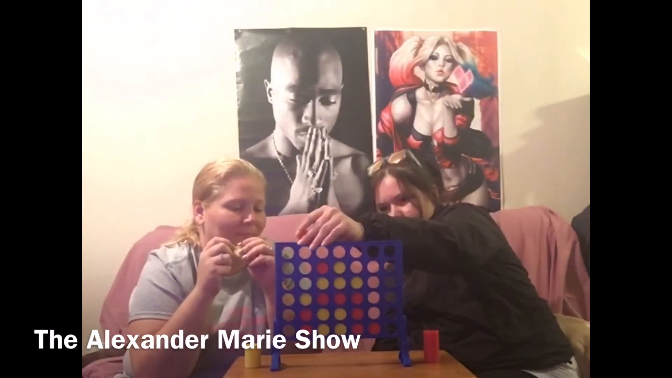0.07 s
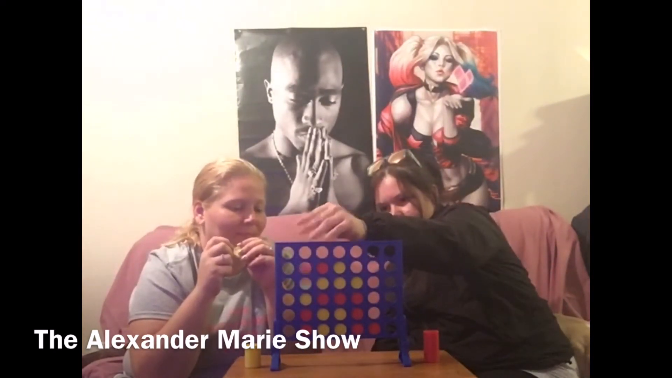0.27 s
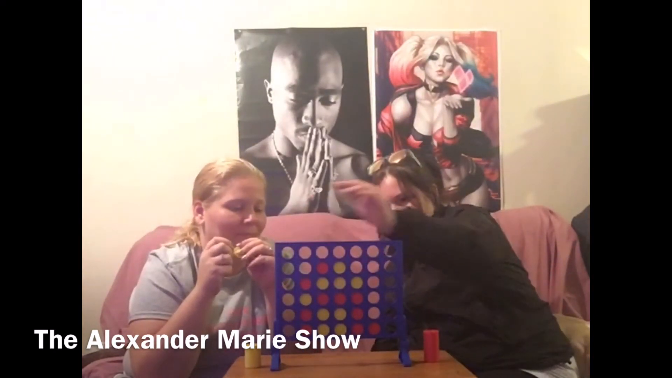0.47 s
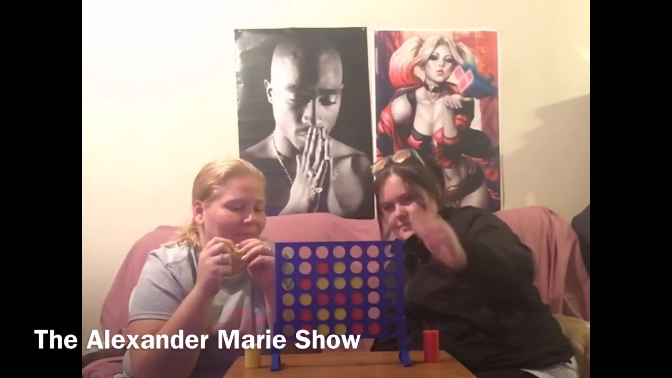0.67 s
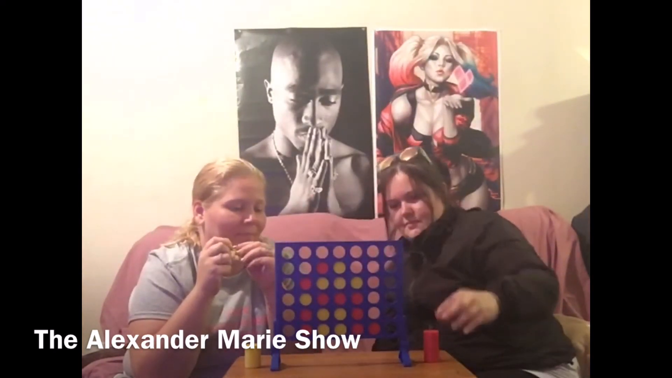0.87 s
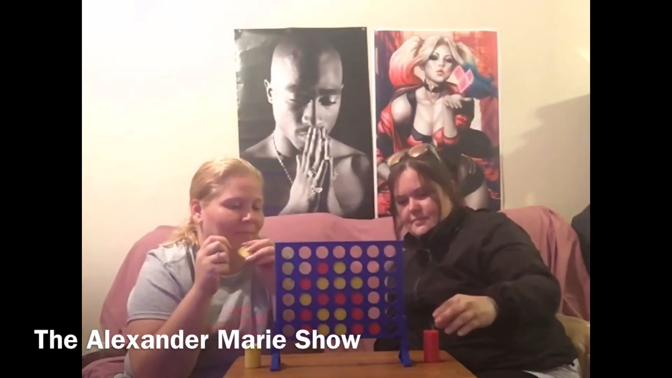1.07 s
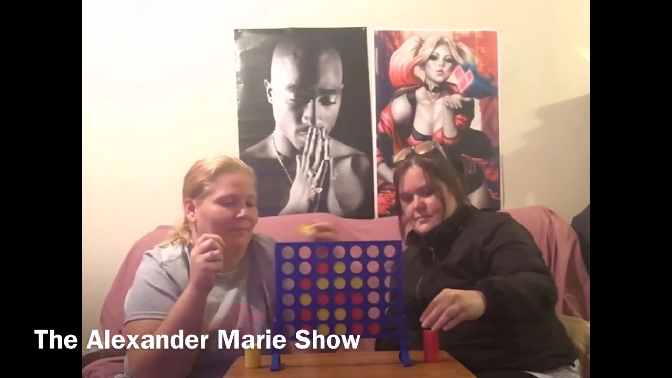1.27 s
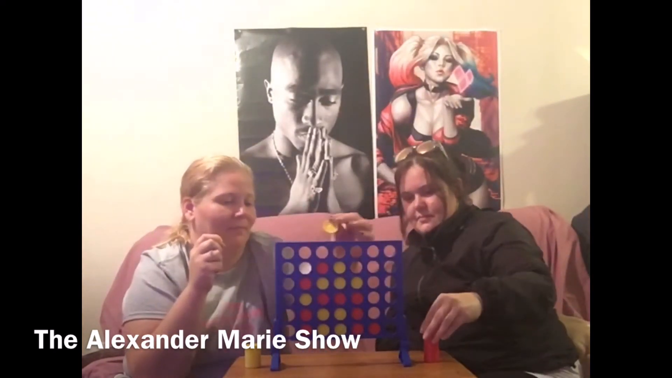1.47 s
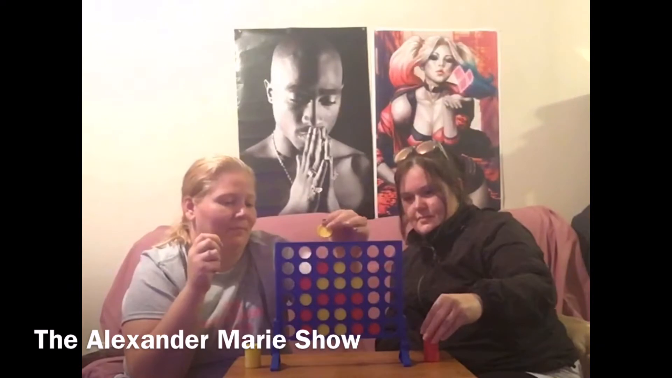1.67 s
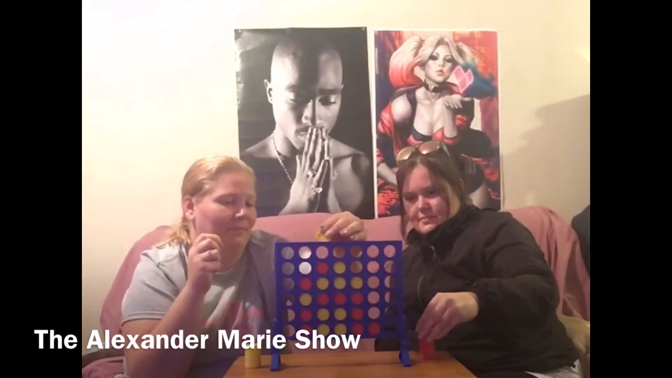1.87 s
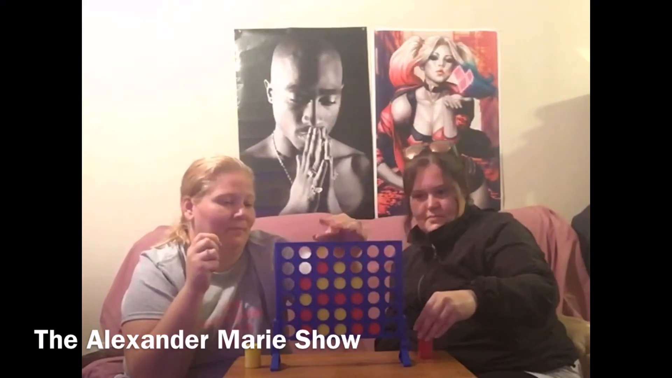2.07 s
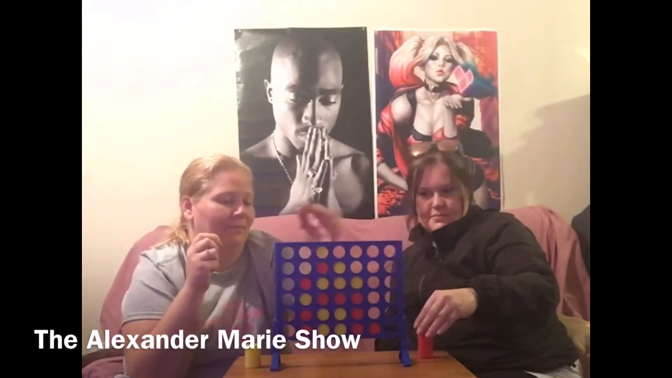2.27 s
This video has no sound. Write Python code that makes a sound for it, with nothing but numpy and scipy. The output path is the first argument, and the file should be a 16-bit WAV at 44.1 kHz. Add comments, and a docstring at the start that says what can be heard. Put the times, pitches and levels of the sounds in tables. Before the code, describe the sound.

Two plastic discs clatter down a game grid in a small, quiet room. The first lands hard, lightly thumping the table and overloading the microphone; the second rubs at the slot, then rattles down more softly over faint hiss.

```python
"""Two discs dropped into a game grid

An upright grid on a table in a small, quiet room, on one microphone. Each plastic disc ticks against the
slot, lands on the stack and rattles to rest: the grid clacks, the disc rings near 4.3 kHz. The first
landing thumps the table and overloads the microphone; soft rubbing leads up to the second drop.
Behind it all lies the room tone: hiss, low rumble and mains hum."""
import sys
import numpy as np
from scipy import signal
from scipy.fft import rfft, irfft, next_fast_len
from scipy.io import wavfile
from scipy.ndimage import uniform_filter1d

SR = 44100
rng = np.random.default_rng(int(sys.argv[2]) if len(sys.argv) > 2 else 0)


def pcm_store(signal):
    """Save signal as 16-bit PCM."""
    levels = np.round(np.clip(np.atleast_2d(signal), -1, 1) * 32767)
    wavfile.write(sys.argv[1], SR, levels.astype(np.int16).T)


N = 101430

# disc hitting grid or stack: t/s, relative clack level/dB, relative ring level/dB,
# lean towards the disc's upper modes/dB, clack cutoff f/Hz
CONTACTS = [ (0.1446, -19.5, -52.5, -1.5, 2693), (0.1504, -31.5, -23.5, -4.5, 9000),
            (0.1730, -31, -29, -4, 5030), (0.1980, -43.5, -31.5, -4.5, 5000),
            (0.2080, -25.5, -20.5, -3.5, 3000), (0.2248, -4, 7, -4, 16970), (0.2290, -7.5, -21.5, 0, 12000),
            (0.236, -16.5, -5.5, 1.5, 9000), (0.249, -12, -7, -3, 9000), (0.2563, -15.5, -4, 1, 8010),
            (0.2755, -16.5, -9, 1, 8000), (0.2880, -20, -15.5, 0, 8000), (0.3045, -14.5, -18, 8.5, 9935),
            (0.3133, -15.5, -4.5, 4, 7010), (0.3164, -11.5, -13.5, 8.5, 12000),
            (0.3360, -28, -9, 0.5, 6000), (0.3460, -26.5, -8.5, 3, 5950), (0.3730, -32.5, -21.5, 1.5, 6000),
            (1.7823, -34, -50.5, -1.5, 6000), (1.8221, -34, -47.5, 1, 4000),
            (1.8836, -24.5, -23.5, 3, 15000), (1.8939, -27, -35, 0, 9000),
            (1.9050, -26.5, -27.5, 0.5, 10000), (1.9321, -30.5, -20.5, -3.5, 8000),
            (1.9496, -25, -17, 2.5, 15020), (1.9610, -38.5, -18, -1, 9060), (1.9738, -10.5, -16, 4, 14000),
            (1.9804, -13.5, -12.5, -3.5, 12000), (1.9925, -16, -23, -2.5, 9060),
            (2.005, -22.5, -15.5, 3, 8990), (2.018, -18.5, -15, 1.5, 9000), (2.0270, -23, -22, 0, 9000),
            (2.0460, -25.5, -20.5, -2, 7000), (2.075, -37.5, -27, -3.5, 6000),
            (2.1130, -50.5, -30, 1, 6015), ]
# spectrum of the clack: f/Hz, relative level/dB
CLACK_SPECTRUM = [(100, -28.5), (300, -16.5), (650, -23.5), (1050, -12), (1900, -5), (2800, -1), (4200, 5),
                  (5500, 1), (7000, -2), (9000, -6), (11000, -11.5), (13200, -11), (15800, -13)]
# modes of the grid's frame: f/Hz, relative level/dB, t60/s
FRAME_MODES = [ (1018, -10.5, .12), (1423, -10, .12), (2776, -3.5, 0.18), (2793, -4.5, .12),
               (3527, -3.5, 0.13), (3579, -1.5, 0.14), (3906, 1.5, 0.21), (3900, -2.5, .14),
               (3996, -0.5, .14), (4070, -1.5, .14), (4608, -5, 0.14), (5120, -5, 0.17), (5430, -5, 0.22),
               (5761, -9.5, .16), ]
CLACK_DB, CLACK_T60_S, FRAME_DB = 14.5, .02, -20
CLACK_ROOM_DB, RING_ROOM_DB = 3, -4  # room over direct sound at the microphone


def grid_clacks():
    """Every contact cracks through the grid and rings its hollow frame a little differently."""
    t = np.arange(SR // 10) / SR
    modes = ringing(FRAME_MODES)
    strength = undb(np.array(FRAME_MODES)[:, 1])
    cracks, frame = np.zeros(N), np.zeros(N)
    for start, clack_db, _, _, cutoff_hz in CONTACTS:
        burst = rng.standard_normal(len(t)) * fade(t, CLACK_T60_S)
        burst = signal.lfilter(*signal.butter(2, cutoff_hz, fs=SR), burst / np.linalg.norm(burst))
        add(cracks, start, undb(CLACK_DB + clack_db) * burst)
        signs = rng.choice([-1, 1], len(strength))
        add(frame, start, undb(FRAME_DB + clack_db) * (strength * signs) @ modes)
    return room(colour(cracks, CLACK_SPECTRUM), CLACK_ROOM_DB) + room(frame, RING_ROOM_DB)


# modes of a disc, plus a brief high microphone ring near 14 kHz:
# f/Hz, relative level/dB, t60/s, share of the contact's lean
RING_MODES = [ (4233, -1, 0.058, -1), (4294, -8, 0.02, 0), (4308, -7, .06, 0), (4333, -8, 0.15, 1.2),
              (4294, -11.5, 0.067, 0.7), (6540, -33, 0.047, .5), (7960, -35.5, 0.129, 1.7),
              (7880, -31, 0.16, 1.7), (12950, -32.5, 0.045, 0), (13950, -30, 0.02023, -1), ]
RING_DB = -1.5


def disc_rings():
    """Each contact rings the disc and, briefly, the microphone; the spot struck decides which modes lead."""
    _, db, _, share = np.array(RING_MODES).T
    modes, out = ringing(RING_MODES), np.zeros(N)
    for start, _, ring_db, lean_db, _ in CONTACTS:
        strength = undb(db + share * lean_db)
        strength /= np.linalg.norm(strength)
        add(out, start, undb(RING_DB + ring_db) * strength @ modes)
    return room(out, RING_ROOM_DB)


# modes of the table top: f/Hz, relative level/dB, t60/s
TABLE_MODES = [(130, -4.5, .2), (175, -9, 0.34), (275, -6, 0.14), (346, 1.5, .045), (430, 5.5, .035),
               (527, 1, .035)]
KNOCK_S, KNOCK_DB = .2255, -29


def table_knock():
    """The hard first landing thumps the table through the grid's feet."""
    out = np.zeros(N)
    strength = undb(KNOCK_DB + np.array(TABLE_MODES)[:, 1])
    add(out, KNOCK_S, strength @ ringing(TABLE_MODES))
    return out


# spectra of the rubbing and of the sliding rim: f/Hz, relative level/dB
RUB_SPECTRUM = [(200, -17), (1000, 0.5), (1700, 1.5), (2150, 4), (2550, -1.5), (3150, 2), (3700, -4.5),
                (4700, -6.5), (5500, -4), (6500, -16), (7500, -21.5), (9200, -16), (11000, -35),
                (12500, -29), (13500, -16), (15500, -27)]
RIM_SPECTRUM = [(3600, -51), (4200, -18), (4340, 23), (4450, -20), (5000, -34)]
# rise and fall of each: t/s, level/dB
RUB_LEVEL = [(1.52, -69.5), (1.62, -53), (1.70, -46.5), (1.76, -47.5), (1.83, -48.5), (1.88, -50.5),
             (1.97, -49.5)]
RIM_LEVEL = [(1.66, -76), (1.74, -53), (1.80, -48), (1.87, -56), (1.90, -66)]
GRAIN_DB, GRAIN_PER_S = 1, 180


def disc_rubbing(t):
    """The second disc is brought to the slot with a grainy rub and sings faintly as its rim slides."""
    grain = undb(GRAIN_DB * wander(GRAIN_PER_S))
    rub = noise(RUB_SPECTRUM) * envelope(t, RUB_LEVEL)
    rim = noise(RIM_SPECTRUM) * envelope(t, RIM_LEVEL)
    return grain * (rub + rim)


# spectrum of the swish: f/Hz, relative level/dB
SWISH_SPECTRUM = [(2000, -28), (5500, 3.5), (8000, -2), (11000, -8), (15500, -8)]
SWISH_S, SWISH_WIDTH_S, SWISH_DB = 1.072, .02, -56.5


def handling_swish(t):
    """A faint, brief swish of handling between the drops, dry at the microphone."""
    swell = np.exp(-.5 * ((t - SWISH_S) / SWISH_WIDTH_S) ** 2)
    return noise(SWISH_SPECTRUM) * undb(SWISH_DB) * swell


# spectra of the room's rumble and hiss: f/Hz, relative level/dB
RUMBLE_SPECTRUM = [(20, -32), (32, -24), (42, 4), (50, 1.5), (62, -6), (78, -8.5), (105, -15), (140, -16.5),
                   (200, -26.5), (400, -58.5)]
HISS_SPECTRUM = [(88, -21.5), (150, -1), (213, -16), (244, -3), (268, -12.5), (320, -15.5), (366, -14),
                 (500, -22), (540, -18.5), (656, -21.5), (894, -16.5), (1450, -17.5), (1600, -14.5),
                 (2860, -24.5), (5230, -27.5), (7560, -38), (15500, -51)]
# drift of the rumble: t/s, level/dB
RUMBLE_LEVEL = [(0, -38), (.3, -41.5), (.85, -41), (1.03, -52), (1.2, -44.5), (1.3, -42), (1.6, -40.5),
                (2.3, -44)]
HISS_DB = -51


def room_tone(t):
    """The room behind the game: an uneven low rumble under steady hiss."""
    rumble = noise(RUMBLE_SPECTRUM) * envelope(t, RUMBLE_LEVEL)
    return rumble + noise(HISS_SPECTRUM) * undb(HISS_DB)


# lines of the hum: f/Hz, base level/dB, share of the swell
HUM_LINES = [(62.1, -46.5, 1.4), (118.8, -49, 1.16), (193, -63.5, 0.38), (238, -57.5, 0.035),
             (363, -70.5, 0)]
# slow swell of the hum: t/s, relative level/dB
HUM_SWELL = [(0, 1.5), (.8, 0.5), (1.0, -8), (1.2, -4), (1.42, 1), (1.65, -3.5), (1.9, -2), (2.3, -7)]
WAVER_DB, WAVER_PER_S = 1.3, 3.7


def mains_hum(t):
    """Mains hum in the room: every line wavers, and the lowest swell and sink together."""
    swell_db = np.interp(t, *np.array(HUM_SWELL).T)
    hum = np.zeros(N)
    for hz, db, share in HUM_LINES:
        rms = undb(db + share * swell_db + WAVER_DB * wander(WAVER_PER_S))
        hum += np.sqrt(2) * rms * np.sin(2 * np.pi * (hz * t + rng.random()))
    return hum


ROOM_DELAY_S, EARLY_T60_S, EARLY_DB = .0026, .12, 11
ROOM_T60_S, TREBLE_T60_S, TREBLE_HZ = .44, .34, 6200


def room(x, wet_db):
    """Direct sound, dense reflections off the table and near walls, a tail whose treble dies first."""
    t = np.arange(int(SR * .7)) / SR
    echoes = rng.standard_normal(len(t)) * (t > ROOM_DELAY_S)
    low = signal.sosfiltfilt(signal.butter(2, TREBLE_HZ, fs=SR, output="sos"), echoes)
    tail = low * fade(t, ROOM_T60_S) + (echoes - low) * fade(t, TREBLE_T60_S)
    early = undb(EARLY_DB) * echoes * fade(t, EARLY_T60_S)
    reflected = unit(signal.fftconvolve(x, early + tail)[:N])
    return x + undb(wet_db) * np.std(x) * reflected


def ringing(modes, attack_s=.0011):
    """One row of decaying sine for each mode, at unit strength."""
    t = np.arange(SR // 4) / SR
    hz, _, t60 = np.array(modes).T[:3, :, None]
    return np.sin(2 * np.pi * hz * t) * fade(t, t60) * (1 - np.exp(-t / attack_s))


def colour(x, spectrum):
    """Causal filter of unit power gain through (f/Hz, level/dB) points."""
    size = 2 * next_fast_len(len(x))
    hz, db = np.array(spectrum).T
    log_hz = np.log(np.fft.rfftfreq(size, 1 / SR) + 1)
    gain = undb(np.interp(log_hz, np.log(hz), db))
    # minimum phase: nothing sounds ahead of a hit
    cepstrum = irfft(np.log(unit(gain)))
    cepstrum[1:size // 2] *= 2
    cepstrum[size // 2 + 1:] = 0
    return irfft(rfft(x, size) * np.exp(rfft(cepstrum)))[:len(x)]


def noise(spectrum):
    """Coloured noise of rms 1."""
    return unit(colour(rng.standard_normal(N), spectrum))


def wander(per_s):
    """Random drift with a spread near 1."""
    hold = int(SR / per_s)
    steps = np.repeat(rng.standard_normal(N // hold + 1), hold)
    return unit(uniform_filter1d(steps, hold))[:N]


def envelope(t, points):
    """Gain through (t/s, level/dB) points, silent outside them."""
    return undb(np.interp(t, *np.array(points).T, left=-np.inf, right=-np.inf))


def add(track, start_s, sound):
    """Mix a sound into a track at a time."""
    i = int(start_s * SR)
    track[i:i + len(sound)] += sound[:N - i]


def undb(db):
    """Decibels to gain."""
    return 10 ** (np.asarray(db) / 20)


def fade(t, t60):
    """Exponential decay, 60 dB down after t60."""
    return np.exp(-np.log(1000) * t / t60)


def unit(x):
    """Scale to rms 1."""
    return x / np.sqrt(np.mean(x ** 2))


def scene():
    """Both drops, the handling and the room as they reach the microphone, in mono."""
    t = np.arange(N) / SR
    drops = grid_clacks() + disc_rings() + table_knock()
    handling = handling_swish(t) + disc_rubbing(t)
    return (drops + handling + room_tone(t) + mains_hum(t))[None]


CLIP_LEVEL, TOP_HZ = .97, 15800


def record(dry):
    """The microphone clips the loudest peaks, then the top treble is cut."""
    clipped = np.clip(dry, -CLIP_LEVEL, CLIP_LEVEL)
    return signal.sosfilt(signal.ellip(10, .2, 70, TOP_HZ, fs=SR, output="sos"), clipped)


dry = scene()
out = record(dry)
pcm_store(out)
```